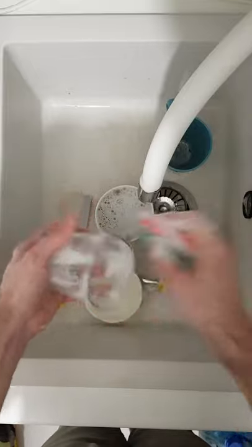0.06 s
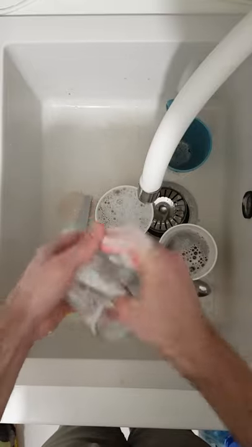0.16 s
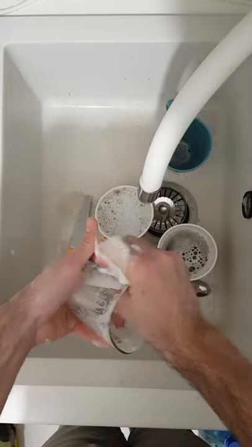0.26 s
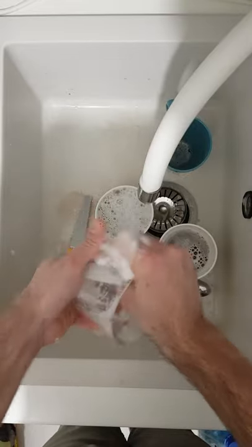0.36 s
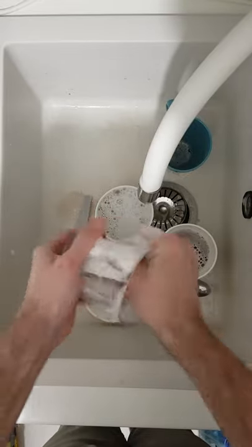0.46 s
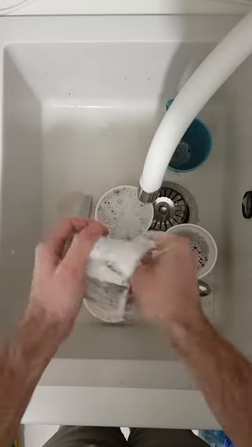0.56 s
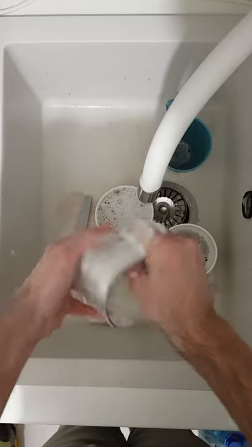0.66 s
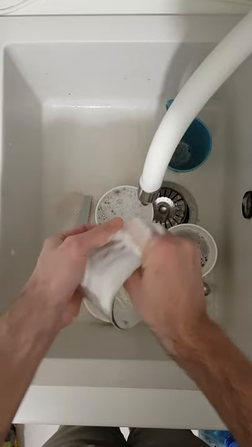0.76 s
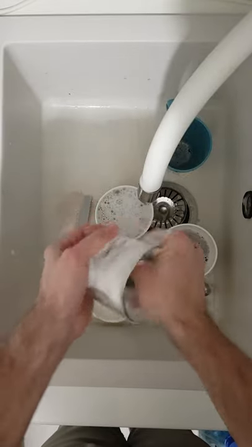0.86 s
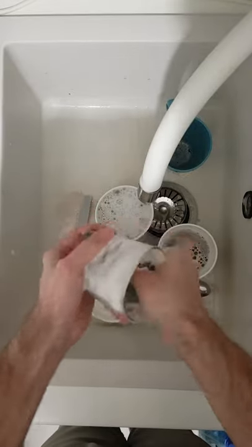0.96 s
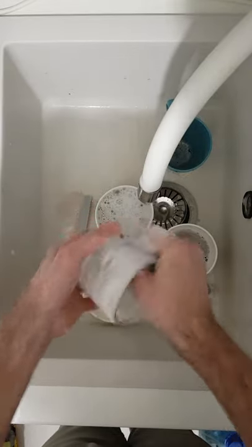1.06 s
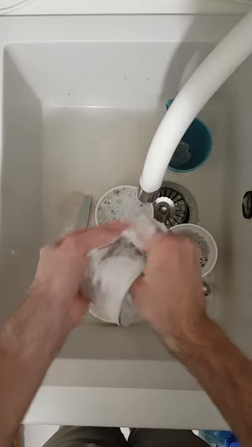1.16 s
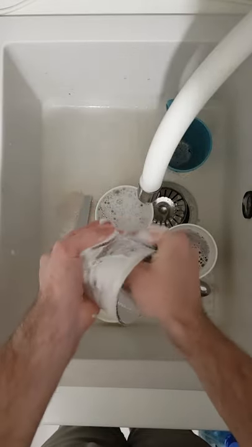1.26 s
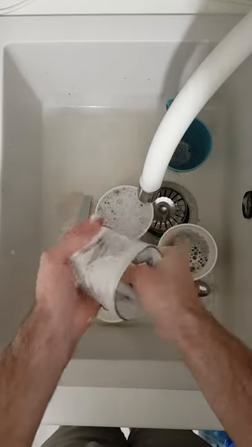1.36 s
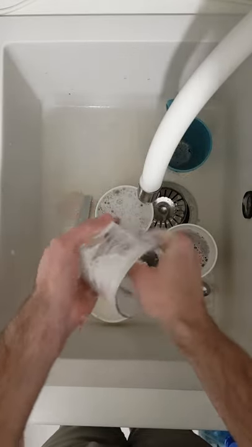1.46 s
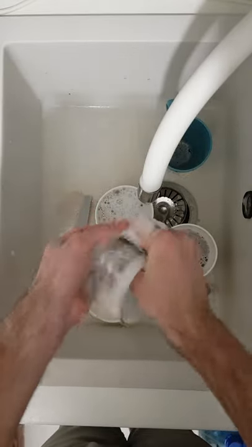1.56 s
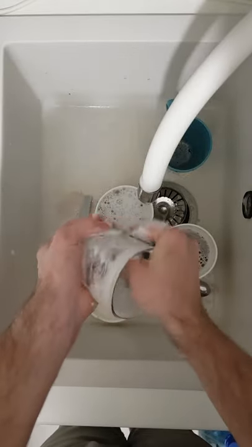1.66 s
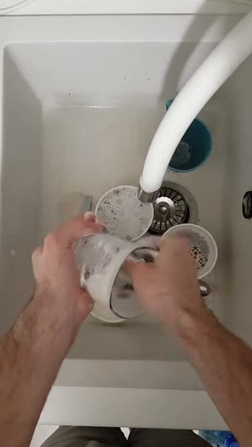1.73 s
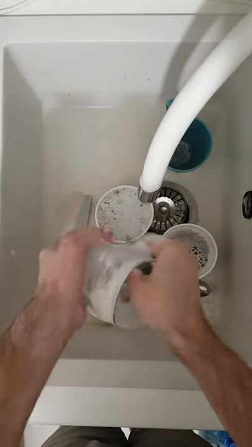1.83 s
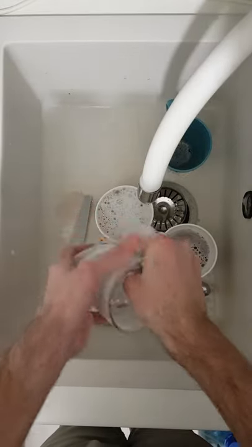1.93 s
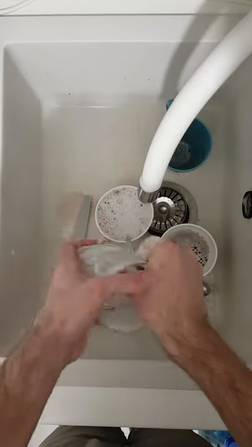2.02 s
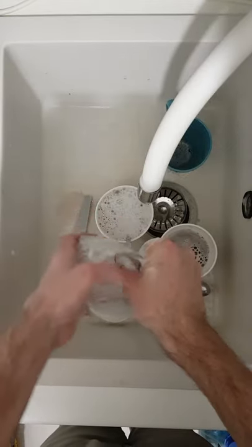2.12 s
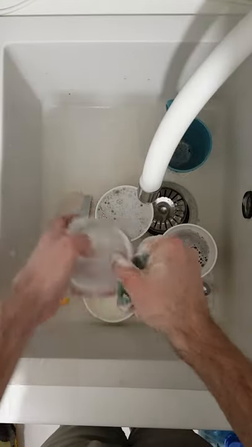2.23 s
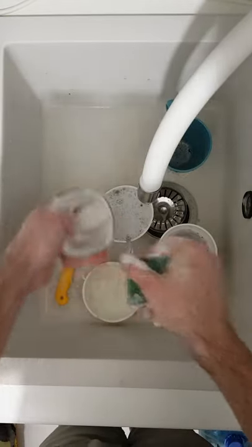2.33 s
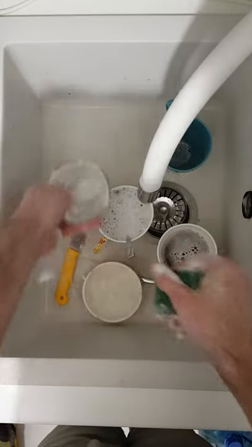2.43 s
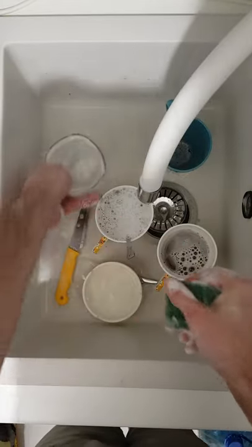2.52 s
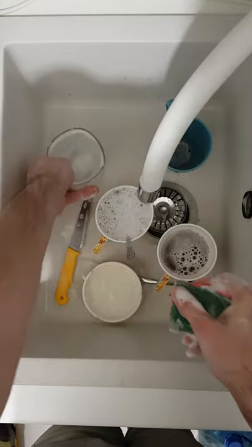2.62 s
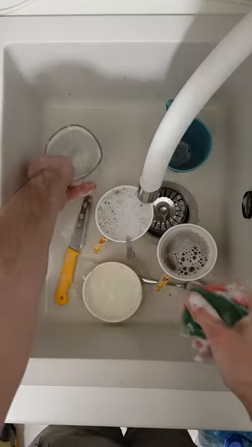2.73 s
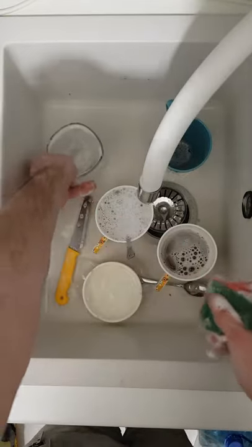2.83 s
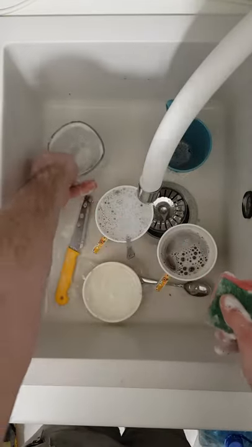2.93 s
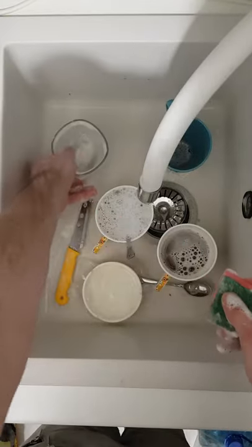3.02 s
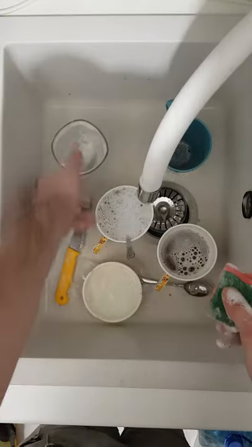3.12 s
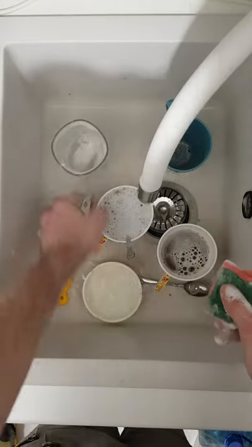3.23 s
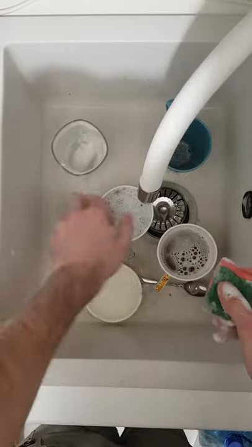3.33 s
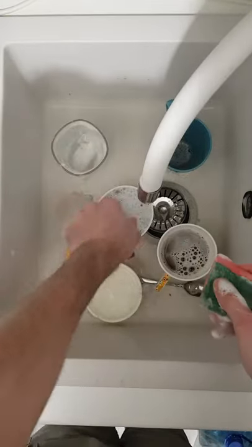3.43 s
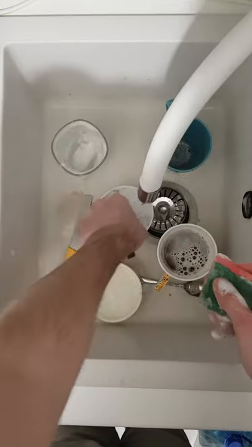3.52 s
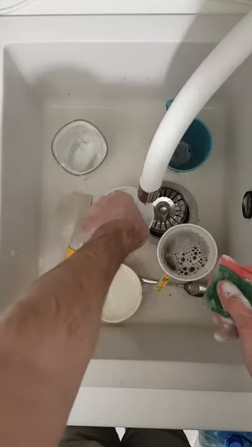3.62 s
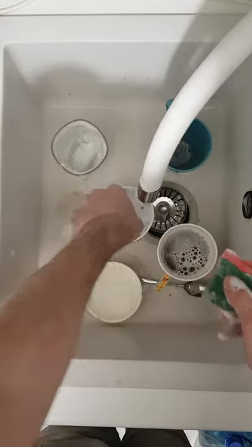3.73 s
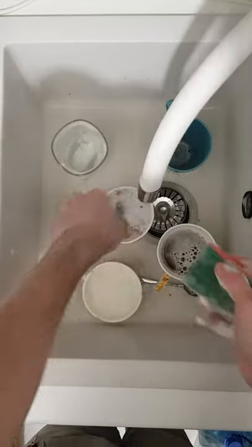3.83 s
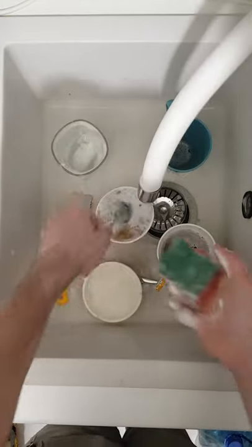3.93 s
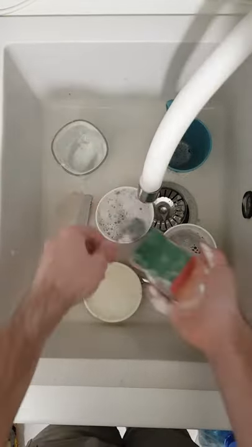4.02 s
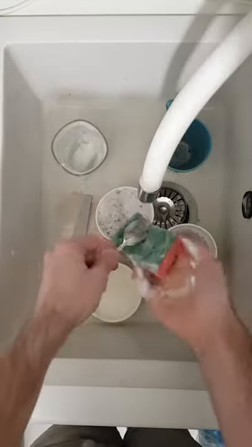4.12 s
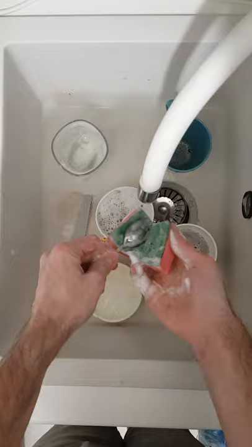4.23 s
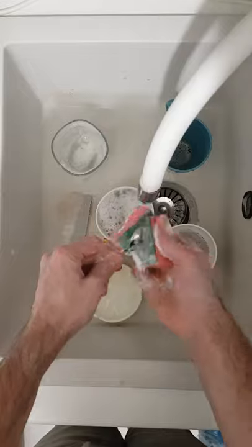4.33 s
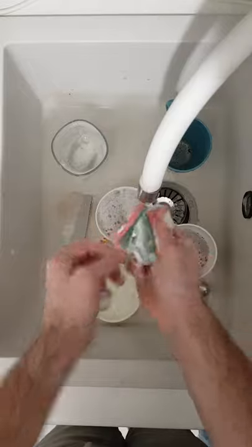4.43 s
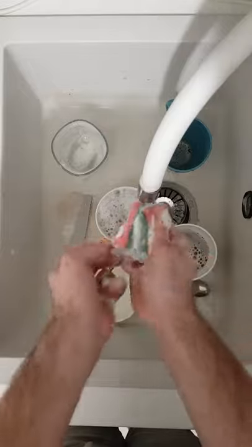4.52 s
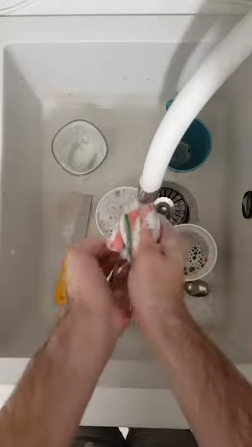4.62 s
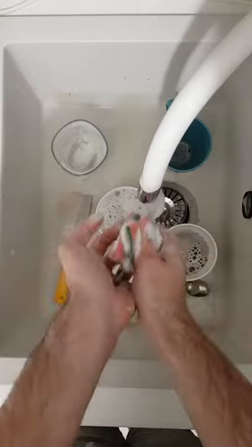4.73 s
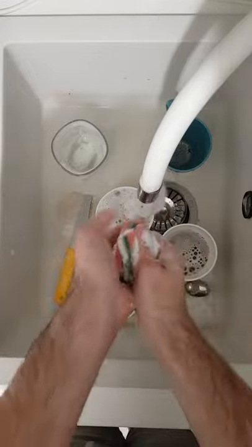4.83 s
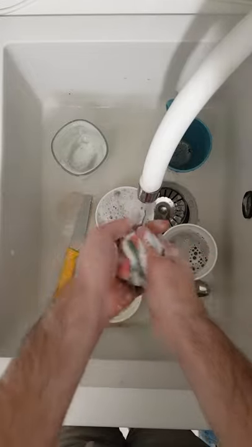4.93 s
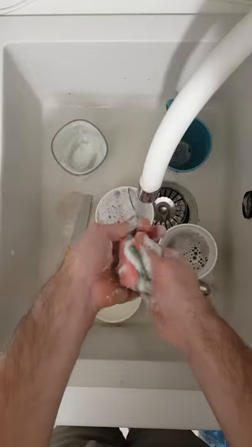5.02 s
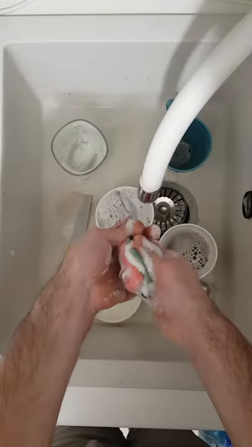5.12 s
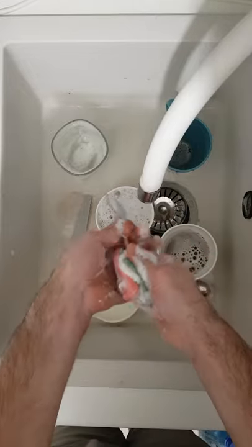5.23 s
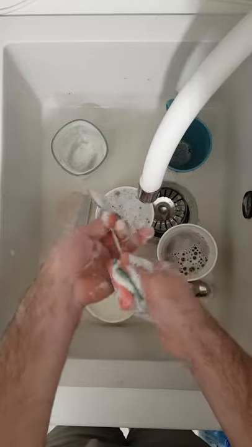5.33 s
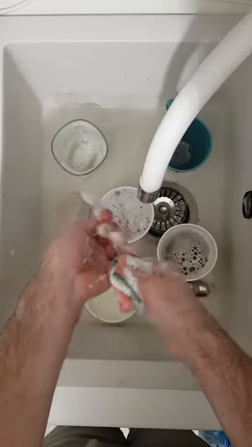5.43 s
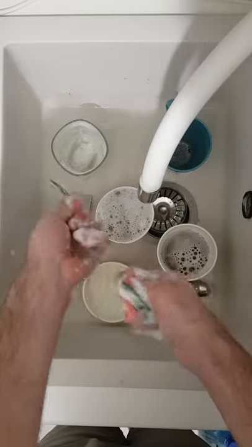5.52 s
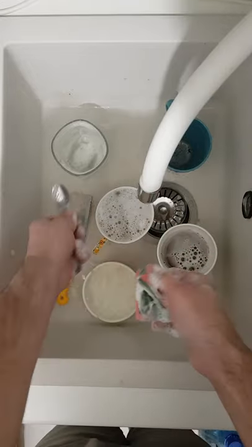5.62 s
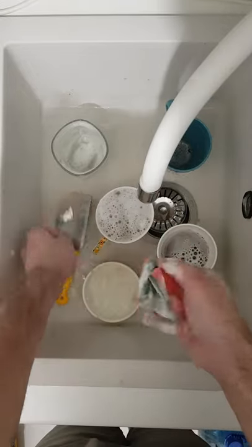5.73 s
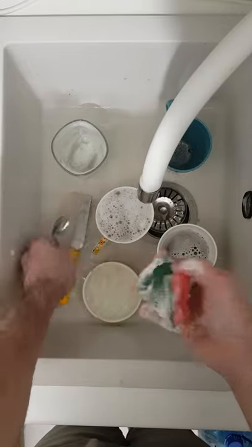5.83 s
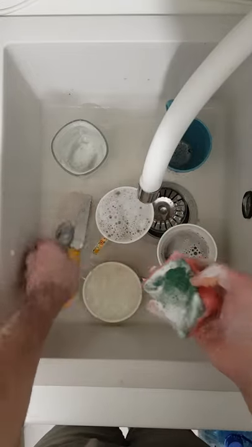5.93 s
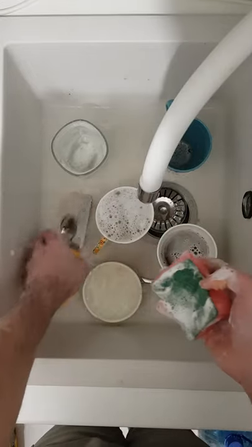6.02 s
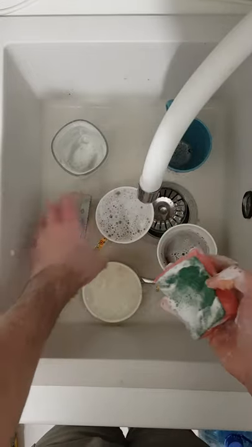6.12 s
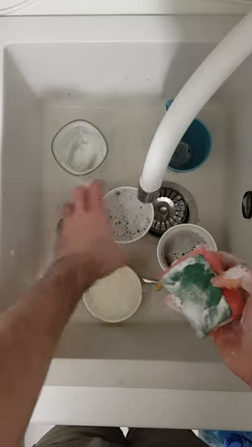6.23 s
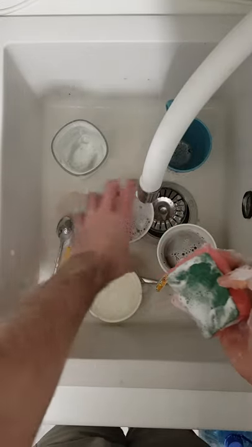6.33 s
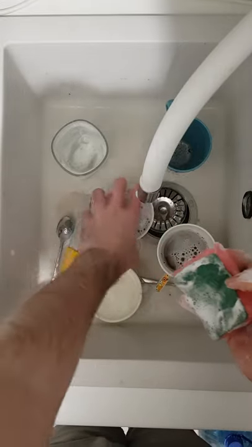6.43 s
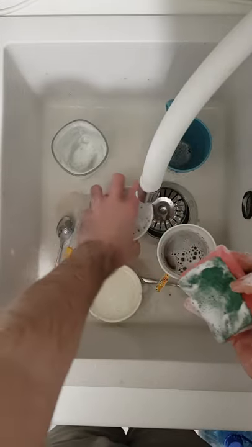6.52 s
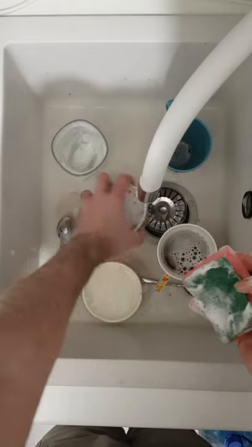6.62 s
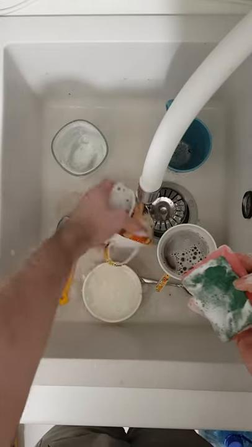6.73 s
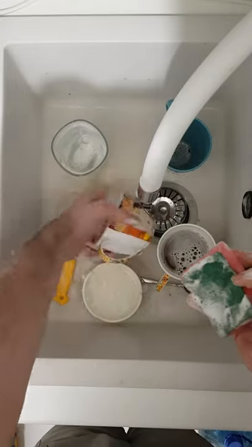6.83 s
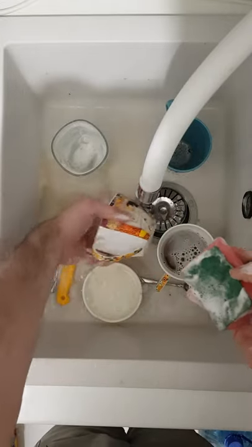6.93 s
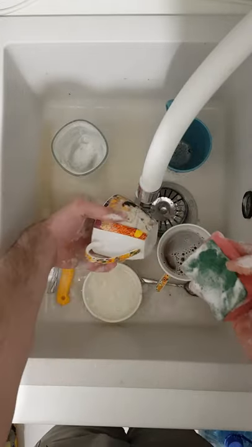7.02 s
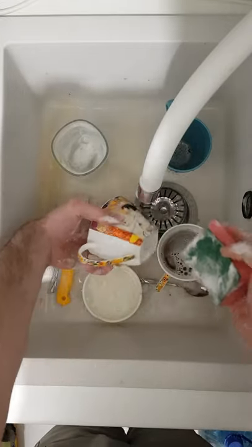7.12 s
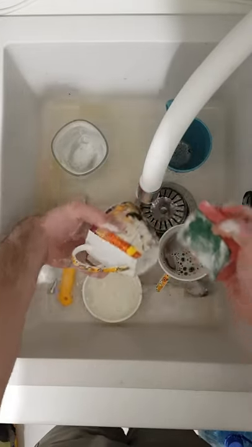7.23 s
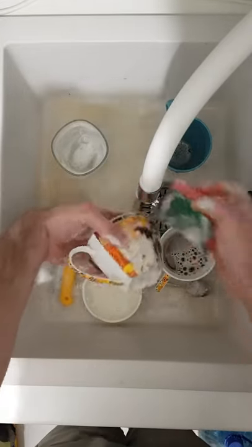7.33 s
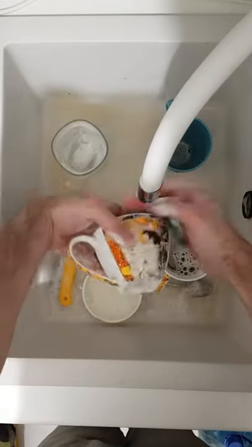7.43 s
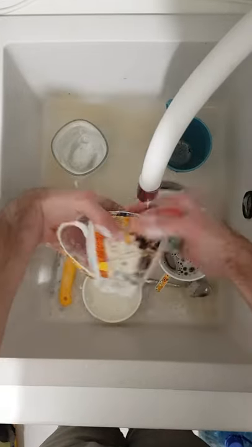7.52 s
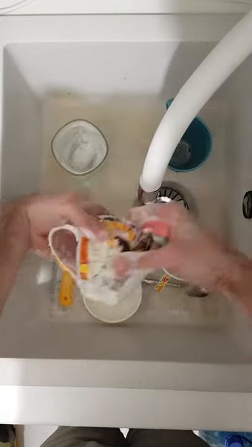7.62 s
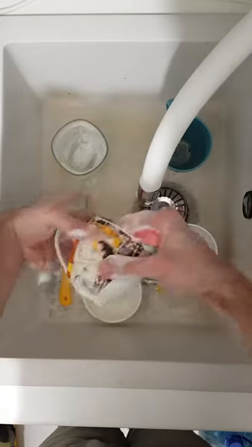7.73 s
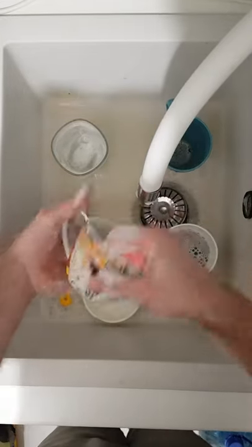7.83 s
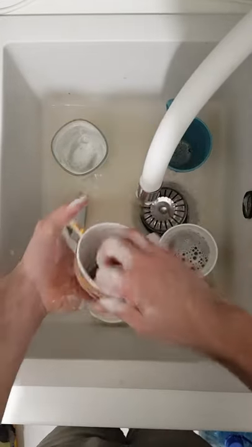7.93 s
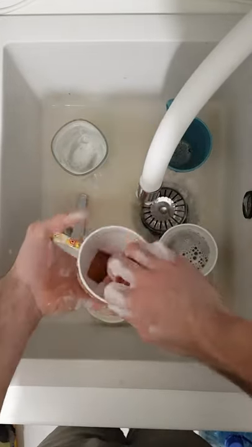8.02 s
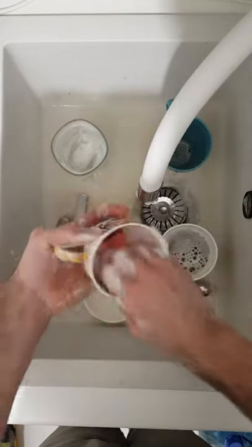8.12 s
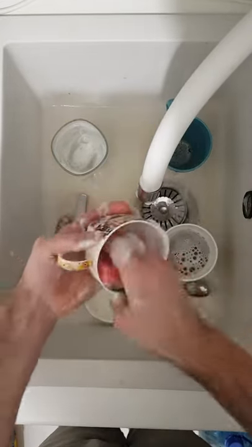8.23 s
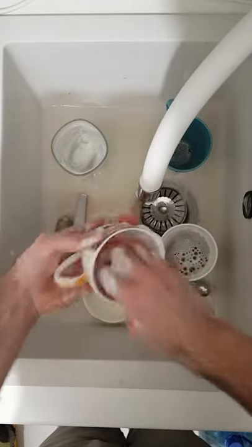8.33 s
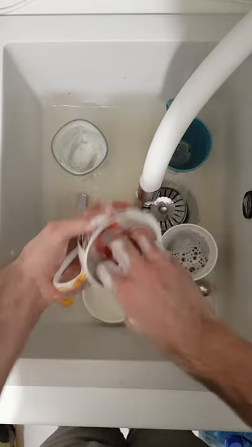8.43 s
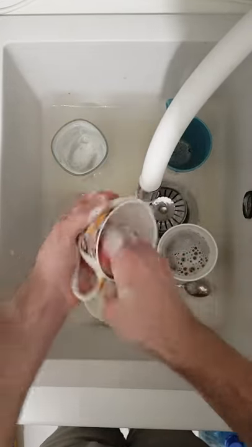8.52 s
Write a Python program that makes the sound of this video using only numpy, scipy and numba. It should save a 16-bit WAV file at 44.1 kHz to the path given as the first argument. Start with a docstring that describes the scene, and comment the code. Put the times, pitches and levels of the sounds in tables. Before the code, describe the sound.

A soapy sponge scrubs a glass in quick, soft strokes, squelching and fizzing, heard from just above a sink in a quiet kitchen. At about 2.9 and 3 seconds the glass is set down with two loud knocks that boom in the basin and leave it ringing briefly. A few soft bumps follow near 3.5 seconds. From about 4.2 to 6 seconds the sponge wipes a spoon with more wet squelches, and just after 6 seconds the spoon drops with a bright, bouncing clatter. A mug drags and rings lightly around 6.5 seconds, then water splashes out of it with bubbly plops from 6.8 to 7.4 seconds. Hollow, wet scrubbing inside the mug follows, with two light clacks near 8.2 seconds and a sharper one at 8.5. A faint low rumble from arms pushing against the sink runs underneath.

```python
"""A soapy sponge washing dishes in a deep composite sink, tap off; stereo microphone just above the basin.
Foam fizzes and water squelches as a glass is scrubbed; it is set down in two knocks that boom in the
basin and leave it ringing. A spoon is wiped and dropped with a clatter. A mug is tipped out, splashing
and trapping bubbles, then scrubbed inside. Underneath, the working arms rumble against the sink in a
quiet kitchen."""
import sys
import numpy as np
from scipy import signal
from scipy.fft import rfft, irfft, next_fast_len
from scipy.io import wavfile
from numba import njit

SR = 44100
rng = np.random.default_rng(int(sys.argv[2]) if len(sys.argv) > 2 else 0)


def persist_wave(psi):
    """Save psi, clipped to +-1, as 16-bit WAV."""
    counts = np.round(np.clip(psi, -1, 1) * 32767).astype(np.int16)
    wavfile.write(sys.argv[1], SR, np.atleast_2d(counts).T)


N = 377496

# sponge strokes on the glass (to 2.8 s), the spoon (to 6 s) and the mug: (time of hardest pressure [s],
# length [s], squelch [dB], foam re squelch [dB], hollow re squelch [dB], resonance of the hollow [Hz])
STROKES = [(0.02, 0.066, -75, 1, 4, 760), (0.168, 0.044, -55.5, 2.5, 2, 1252),
           (0.213, .06, -53, 0, -1.5, 1600), (0.304, 0.082, -52, 0, -4.5, 801),
           (0.388, 0.15, -57, -1.5, -3.5, 1400), (0.519, .075, -48.5, -3.5, 1.5, 796),
           (0.636, .06, -55, -5.5, -5, 1506), (0.849, .1, -54, -4.5, -15, 1500),
           (0.946, 0.067, -46.5, -7, -2.5, 1210), (1.058, 0.11, -64.5, -3, -4, 1700),
           (1.256, 0.15, -61, -0.5, -7, 1600), (1.348, 0.094, -50, -3.5, -5.5, 1350),
           (1.504, 0.048, -56, 0, -5, 1310), (1.624, 0.085, -63.5, 3.5, -17, 1800),
           (1.7, 0.075, -56, -3, -8, 1480), (1.789, 0.033, -62, -10, -3, 900),
           (1.855, 0.044, -66, 2, -3, 1700), (2.124, 0.17, -63, -7, -8, 1640),
           (2.266, .13, -63.5, 0, -8, 1856), (2.682, .22, -66, -2.5, 0, 1490),
           (4.21, 0.12, -68, 2, -20, 1801), (4.322, 0.12, -62, -0.5, -23, 1590),
           (4.417, 0.1, -43, -9, -4, 1343), (4.623, 0.11, -50, -15, -4.5, 1241),
           (4.754, 0.18, -50.5, -14, -5.5, 1370), (5.079, .12, -65, -16, -16, 1630),
           (5.328, .15, -50, -18.5, -12.5, 1606), (5.481, 0.063, -47.5, -9.5, -5, 1603),
           (5.676, 0.11, -58, -3, -9.5, 1800), (5.785, 0.057, -70, -4.5, -13.5, 1490),
           (5.921, 0.1, -68.5, 1.5, -17, 1580), (7.493, 0.069, -53, -4.5, -3.5, 1460),
           (7.598, 0.16, -61, -1, -7, 1453), (7.726, 0.064, -49.5, -8.5, 3.5, 900),
           (7.949, .08, -64.5, -5.5, -6.5, 1315), (8.09, 0.076, -53, -5.5, 7, 967),
           (8.14, 0.12, -50, -10.5, -5, 1260), (8.244, 0.1, -49.5, -15, 0.5, 1239),
           (8.326, 0.07, -55.5, -14, -2, 1130), (8.404, 0.053, -50, -12, 5.5, 1138),
           (8.485, 0.065, -53.5, -11, 0, 1210), (8.536, 0.056, -47, -16, 2.5, 1150)]
# dishes and hands meeting the basin: (time [s], level [dB], contact [ms], build-up [ms])
KNOCKS = [(0.525, -48.5, 10.6, 8), (0.573, -56, 3.8, 4.5), (1.151, -61, 13, 8.2),
          (2.867, -11.3, 0.61, 0.95), (3.014, -37, 2.1, 17), (3.042, -10.5, 0.65, 0.94),
          (3.508, -47.5, 9.6, 15), (3.559, -39, 2.05, 9.2), (3.594, -47.5, 0.43, 19),
          (3.63, -47.5, 1.55, 3.7), (3.735, -65, 0.54, 3), (3.891, -69, 3.2, 3.06), (4.233, -63.5, 11, 7),
          (5.83, -67, 5, 14), (5.976, -37.5, 1.15, 12), (6.075, -26.5, 0.94, 0.76),
          (6.518, -42.5, 0.58, 45), (6.565, -40.5, 1.5, 7), (7.524, -55, 8.3, 15), (8.39, -62.5, 5.3, 24),
          (8.532, -40, 0.71, 8.4)]
# spectrum of foam and spray: (frequency [Hz], level [dB])
FIZZ = [(1200, -19.5), (2500, -3.5), (3600, 0.5), (5000, -0.5), (7300, -3), (8800, -8), (12000, -3.5),
        (16000, -18)]
# how alike the microphone's two ports sound: (frequency [Hz], likeness [-1..1])
LIKENESS = [(60, 0.93), (250, 0.52), (600, 0.2), (1200, 0), (2400, -0.09), (6000, 0.05), (15000, 0.08)]


def from_db(db):
    """Decibels to gain."""
    return 10 ** (np.asarray(db) / 20)


def rms_one(x):
    """Scale to rms 1."""
    return x / np.sqrt(np.mean(x ** 2) + 1e-20)


def unit_attack(x):
    """Scale a blow so that its first 20 ms have rms 1."""
    return x / np.sqrt(np.mean(x[:, :SR // 50] ** 2) + 1e-20)


def at_hz(points, hz):
    """Read a table on a log-frequency axis."""
    f, value = np.transpose(points)
    return np.interp(np.log(np.maximum(hz, 1)), np.log(f), value)


def colour(x, spectrum):
    """Give a steady sound a spectrum, falling away beyond its ends."""
    hz = np.maximum(np.fft.rfftfreq(x.shape[-1], 1 / SR), 1)
    skirts = np.minimum(hz / spectrum[0][0], 1) ** 2 * np.minimum(spectrum[-1][0] / hz, 1) ** 2
    return irfft(rfft(x) * from_db(at_hz(spectrum, hz)) * skirts, x.shape[-1])


def ports(pair):
    """Two unrelated signals become left and right: alike in the bass, apart in the treble."""
    count = pair.shape[-1]
    alike = at_hz(LIKENESS, np.fft.rfftfreq(count, 1 / SR))
    mid, side = rfft(pair)
    return irfft(np.sqrt(1 + alike) * mid + np.sqrt(1 - alike) * side * [[1], [-1]], count)


def diffuse_noise(spectrum, count):
    """Coloured noise as the two ports pick it up."""
    return colour(ports(rng.standard_normal((2, count))), spectrum)


def pan(db):
    """Left and right gains for a level difference."""
    return from_db(np.array([[.5], [-.5]]) * db)


def add(out, s, sound):
    """Mix a sound in at its time."""
    start = int(s * SR)
    out[:, start:start + sound.shape[1]] += sound[:, :N - start]


def held(start, end, attack_s, release_s):
    """Attack, hold at 1, release."""
    t = np.arange(N) / SR
    onset = 1 - np.exp(-np.maximum(t - start, 0) / attack_s)
    return onset * np.exp(-np.minimum(np.maximum(t - end, 0) / release_s, 30))


def push(s, length, edge_db=6.5, rise_share=0.46, roundness=1.6):
    """Pressure swells to 1 and eases off again, edge_db down at both ends of its length."""
    t = np.arange(N) / SR - s
    away = np.maximum(-t / rise_share, t / (1 - rise_share)) / length
    return from_db(-np.minimum(edge_db * away ** roundness, 200))


def in_basin(x, echo_db, t60=0.12, size=2048, lag_samples=6):
    """Direct sound, later at the right port, then wall echoes that keep changing as the hands move."""
    count = len(x) // size + 1
    pieces = np.pad(x, (0, count * size - len(x))).reshape(count, size)
    decay = from_db(-60 * np.arange(3 * size) / (SR * t60))
    walls = rng.standard_normal((2, count, len(decay))) * decay / np.sqrt(np.sum(decay ** 2))
    echoes = signal.fftconvolve(pieces[None], walls, axes=2)
    out = np.zeros((2, next_fast_len((count + 4) * size)))
    for k in range(count):
        out[:, k * size:k * size + echoes.shape[2]] += echoes[:, k]
    direct = np.array([x, np.pad(x, (lag_samples, 0))[:len(x)]])
    return direct + from_db(echo_db) * ports(out)[:, :len(x)]


def bursts(per_s, spread_db):
    """Clicks at random moments, their sizes scattered by spread_db."""
    sizes = from_db(spread_db * np.minimum(rng.exponential(1, N), 4.5)) * rng.choice([-1, 1], N)
    return sizes * (rng.random(N) < per_s / SR)


def suds(spectrum, per_s, spread_db, echo_db):
    """Countless tiny films burst at random and echo in the basin; rms 1."""
    # where the hands sit in the stereo image: (frequency [Hz], left minus right [dB])
    hand_balance = [(100, 1), (700, 8.5), (1300, -5.5), (2400, -3.5), (4400, 4.5), (8000, 5.5),
                    (15000, 4.5)]
    balance = pan(at_hz(hand_balance, np.fft.rfftfreq(N, 1 / SR)))
    crackle = in_basin(bursts(per_s, spread_db), echo_db)
    return rms_one(colour(irfft(rfft(crackle) * balance, N), spectrum))


def bubbles(per_s, cycles, low_hz, high_hz, count=24):
    """Small air pockets, each ringing briefly at a pitch set by its size; rms 1."""
    births = bursts(per_s, spread_db=0)
    size_class = rng.integers(0, count, N)
    out = 0
    for k, hz in enumerate(np.geomspace(low_hz, high_hz, count)):
        r, w = from_db(-60 * hz / (cycles * SR)), 2 * np.pi * hz / SR
        kicks = births * (size_class == k) + 1e-18
        out = out + signal.lfilter([0, np.sin(w)], [1, -2 * r * np.cos(w), r * r], kicks)
    return rms_one(in_basin(out, echo_db=0.5))


@njit
def resonate(x, hz, width_hz):
    """A two-pole band-pass whose centre moves."""
    y, r = np.zeros_like(x), np.exp(-np.pi * width_hz / SR)
    for i in range(2, x.shape[1]):
        turn = 2 * r * np.cos(2 * np.pi * hz[i] / SR)
        for c in range(2):
            drive = (1 - r * r) / 2 * (x[c, i] - x[c, i - 2])
            y[c, i] = drive + turn * y[c, i - 1] - r * r * y[c, i - 2]
    return y


def scrubbing(grip_s=0.022, held_squelch_db=-2):
    """Strength of fizz, squelch and hollow: each stroke adds its power to that of the held sponge."""
    # the sponge keeps fizzing while held to a dish: (start [s], end [s], foam level [dB])
    holds = [(0.0, 1.92, -69), (1.97, 3.26, -76.5), (3.7, 4.15, -79), (4.15, 4.95, -72.5),
             (4.95, 5.45, -82.5), (5.5, 6.02, -72.5), (7.4, 8.15, -67)]
    fizz = sum(from_db(db) * held(start, end, grip_s, grip_s) for start, end, db in holds) ** 2
    squelch, hollow = fizz * from_db(held_squelch_db) ** 2, 0
    for s, length, db, foam_db, hollow_db, _ in STROKES:
        pressure = push(s, length)
        fizz = fizz + (from_db(db + foam_db) * pressure ** 0.99) ** 2
        squelch = squelch + (from_db(db) * pressure) ** 2
        hollow = hollow + (from_db(db + hollow_db) * pressure ** 1.4) ** 2   # needs firm pressure
    return np.sqrt([fizz, squelch, hollow])


def sponge():
    """Foam fizzes on top, water squelches in the pores, and the hollow of hand and dish resounds."""
    # spectra of the wet pores, the hollow and the gush through it: (frequency [Hz], level [dB])
    pore_spectrum = [(600, -32.5), (1050, -8), (1380, -1.5), (1700, 0), (2200, -1.5), (3000, -8.5),
                     (5000, -20)]
    hollow_spectrum = [(130, -24.5), (210, -23.5), (262, -4.5), (305, -22), (420, -7.5), (530, -4),
                       (680, -7), (790, 5), (950, -5), (1150, -8.5), (1600, -25)]
    gush_spectrum = [(400, -12.5), (700, -2.5), (2400, -2), (4000, -9.5)]
    fizz, squelch, hollow = scrubbing()
    foam = from_db(4.5) * fizz * suds(FIZZ, per_s=3000, spread_db=4.5, echo_db=4.5)
    pores = from_db(0.5) * suds(pore_spectrum, per_s=650, spread_db=1, echo_db=4)
    pores += from_db(-8) * bubbles(per_s=200, cycles=12, low_hz=1150, high_hz=3600)
    body = from_db(-1) * hollow * suds(hollow_spectrum, per_s=900, spread_db=2, echo_db=0.5)
    # the gap between hand and dish opens and closes with each stroke, moving its resonance
    times, *_, hollow_hz = np.transpose(STROKES)
    gap_hz = np.interp(np.arange(N) / SR, times, hollow_hz)
    gush = suds(gush_spectrum, per_s=700, spread_db=3, echo_db=0.5)
    cavity = rms_one(resonate(gush, gap_hz, width_hz=280.0))
    return foam + squelch * pores + body + from_db(-3) * np.hypot(squelch, hollow) * cavity


def room_tone():
    """The steady quiet of the kitchen."""
    # spectrum of the room: (frequency [Hz], level [dB])
    room_spectrum = [(18, -32), (30, -19), (93, -6), (134, -14.5), (161, -25.5), (280, -20), (461, -15),
                     (913, -35), (1590, -30.5), (3580, -38.5), (4420, -25), (6050, -33.5), (16000, -20)]
    return from_db(-72) * rms_one(diffuse_noise(room_spectrum, N))


def sink_rumble(arms_db=-73.5, shudder_db=-24.5, attack_s=0.006, shudder_t60_s=0.83):
    """Working arms push the sink, and knocks shake it by their force times their contact time."""
    # arms pushing against the sink: (time [s], length [s], level [dB])
    arm_pushes = [(0.22, 0.23, -66), (0.55, 0.062, -52), (0.66, 0.12, -53.5), (0.97, 0.086, -56),
                  (1.17, 0.078, -63), (2.6, 0.084, -52.5), (3.607, 0.14, -49.5), (4.25, 0.052, -53.5),
                  (4.57, .05, -63.5), (5.01, 0.056, -61), (5.57, 0.075, -48.5), (5.8, .2, -64.5),
                  (6.0, .06, -46.5), (6.93, .08, -59), (7.6, 0.23, -49), (8.43, 0.064, -60)]
    # spectrum of the whole sink shaking: (frequency [Hz], level [dB])
    sink_spectrum = [(22, -23.5), (42, -7.5), (60, 2.5), (82, -10.5), (105, -4), (150, -21), (300, -26),
                     (600, -48.5)]
    shoves = [from_db(db) * push(s, length) for s, length, db in arm_pushes]
    shudders = [from_db(db + shudder_db) * contact_ms * held(s, s, attack_s, shudder_t60_s / np.log(1000))
                for s, db, contact_ms, _ in KNOCKS]
    strength = np.sqrt(from_db(arms_db) ** 2 + sum(gain ** 2 for gain in shoves + shudders))
    return from_db(-3.5) * strength * rms_one(diffuse_noise(sink_spectrum, N)) * pan(2.4)


def reflections(spectrum, t60_scale, crack_db, kitchen_db, hold_s):
    """A first crack, echoes that circle the basin briefly and die by band, and a faint kitchen tail."""
    # ring time of the basin, before t60_scale: (frequency [Hz], t60 [s])
    basin_t60 = [(60, 0.17), (250, 0.34), (1000, 0.24), (3000, 0.15), (8000, 0.27), (15000, 0.24)]
    t = np.arange(SR) / SR
    noise = rfft(diffuse_noise(spectrum, SR))
    octave = np.log2(np.clip(np.fft.rfftfreq(SR, 1 / SR), 62.5, 16000) / 62.5)
    crack = from_db(crack_db) * np.exp(-t / 0.0023)
    kitchen = from_db(kitchen_db - 60 * t / .5)
    out = 0
    for k in range(9):
        band = irfft(noise * np.maximum(1 - abs(octave - k), 0), SR)
        t60 = t60_scale * at_hz(basin_t60, 62.5 * 2 ** k)
        echoes = from_db(-60 * np.maximum(t - hold_s, 0) / t60)
        out = out + band * (crack + echoes + kitchen)
    return out


def ringing(modes):
    """Decaying sines; the higher ones reach the two ports out of step."""
    t, out = np.arange(SR) / SR, 0
    for hz, db, t60 in modes:
        apart = np.arccos(at_hz(LIKENESS, hz)) * rng.choice([-.5, .5])
        phase = rng.uniform(0, 2 * np.pi) + np.array([[apart], [-apart]])
        out = out + from_db(db - 60 * t / t60) * np.sin(2 * np.pi * hz * t + phase)
    return out


def swell(ms):
    """A dragged contact builds up gradually."""
    return 1 - np.exp(-1000 * np.arange(SR) / SR / ms)


def soften(x, contact_ms):
    """A soft, long contact cannot excite the high frequencies."""
    lowpass = signal.butter(2, 1000 / contact_ms, fs=SR, output="sos")
    return unit_attack(signal.sosfilt(lowpass, x))


def knocks(in_step_hz=600):
    """Each blow sets the basin booming; a short contact is bright, a dragged one swells up."""
    # resonances of the basin: (frequency [Hz], level [dB], t60 [s])
    basin_modes = [(108, -26, 0.28), (262.5, -10, .23), (338, -13, 0.22), (505, -14.5, 0.24),
                   (564, -16, .15), (791, -10, .17), (897.7, 2.5, .15), (1020, -15.5, 0.09),
                   (1260, -1, 0.12), (1520, -7.5, 0.1), (1600, -1.5, .11), (1748, -3.5, .14),
                   (2121, -2, 0.098), (2560, -0.5, .11)]
    # spectrum of a blow on the basin: (frequency [Hz], level [dB])
    thud_spectrum = [(40, -16), (100, -13), (170, -15), (300, -5.5), (600, -7.5), (1000, -2), (1600, 2),
                     (2600, -1.5), (3800, -5), (6000, -11.5), (10000, -8), (15000, -13.5)]
    out = np.zeros((2, N))
    for s, db, contact_ms, build_up_ms in KNOCKS:
        thud = reflections(thud_spectrum, t60_scale=0.7, crack_db=-13.5, kitchen_db=-22, hold_s=0.012)
        boom = ringing(basin_modes)
        blow = (unit_attack(thud) + unit_attack(boom)) * swell(build_up_ms)
        add(out, s, from_db(db) * soften(blow, contact_ms))
    # the long waves of the whole basin reach both ports in step
    highpass = signal.butter(1, in_step_hz, "high", fs=SR, output="sos")
    side = signal.sosfilt(highpass, (out[0] - out[1]) / 2)
    return (out.mean(axis=0) + side * [[1], [-1]]) * pan(1)


def plops(cycles=40, rise=0.06, gain_db=-11):
    """A trapped bubble swells over one cycle, rings with rising pitch and echoes off the walls."""
    # single air pockets popping in water and suds: (time [s], level [dB], starting pitch [Hz])
    air_pockets = [(0.634, -43.5, 1400), (0.964, -36, 594), (4.242, -45, 1940), (6.847, -38.5, 3690),
                   (6.894, -27.5, 1140), (6.911, -34, 550), (6.932, -33.5, 4100), (7.003, -41.5, 1260),
                   (7.025, -37, 1750), (7.085, -29.5, 3530), (7.101, -22.5, 2260), (7.119, -27.5, 2370),
                   (7.159, -33, 518), (7.181, -35, 564), (7.222, -27.5, 1690), (7.274, -37, 1630),
                   (7.319, -43, 1660), (8.022, -45, 2250)]
    out, t = np.zeros((2, N)), np.arange(SR // 5) / SR
    for s, db, hz in air_pockets:
        age = t * hz / cycles
        pitch = hz * (1 + rise * np.minimum(age, 1))
        envelope = np.minimum(t * hz, 1) * from_db(-60 * age)
        bubble = envelope * np.sin(2 * np.pi * np.cumsum(pitch) / SR)
        add(out, s, from_db(db + gain_db) * unit_attack(in_basin(bubble, echo_db=-1)))
    return out


def ticks():
    """Bright ticks of drops and rims, and the snap of the glass landing."""
    # ticks and snaps: (time [s], level [dB])
    tick_events = [(1.631, -55.5), (2.868, -51), (3.043, -46.5), (3.566, -58.5), (4.908, -61),
                   (6.8486, -46), (7.3699, -47.5), (7.9287, -57)]
    # spectrum of a tick: (frequency [Hz], level [dB])
    tick_spectrum = [(800, -36), (2500, -9), (4000, -2), (7500, -7.5), (15000, -9)]
    out = np.zeros((2, N))
    for s, db in tick_events:
        tick = reflections(tick_spectrum, t60_scale=0.68, crack_db=3, kitchen_db=-28, hold_s=0.001)
        add(out, s, from_db(db) * unit_attack(tick))
    return out


def dish_rings():
    """The glass rings on after landing; the mug starts singing as its foot drags."""
    # the glass landing, the mug dragged and lifted: (time [s], level [dB])
    glass_taps = [(2.868, -35), (3.043, -32)]
    mug_taps = [(6.524, -31.5), (6.568, -25.5)]
    # resonances of glass and mug: (frequency [Hz], level [dB], t60 [s])
    glass_modes = [(1816, 0, .66), (1920, 0, 0.53), (2150, -6, 0.33)]
    mug_modes = [(1480, 2, 0.12), (1870, -17, 0.089)]
    glass = ringing(glass_modes) * swell(ms=0.97)
    mug = ringing(mug_modes) * swell(ms=12)
    out = np.zeros((2, N))
    for taps, ring in ((glass_taps, glass), (mug_taps, mug)):
        for s, db in taps:
            add(out, s, from_db(db) * ring)
    return out


def spoon(longest_t60_s=0.25):
    """Steel clatters on the basin floor; each landing excites the resonances differently."""
    # the spoon lands and bounces: (time [s], level [dB], contact [ms])
    landings = [(6.021, -38, 0.088), (6.075, -15.5, 0.081), (6.154, -28, 0.11)]
    # ringing of the steel spoon, with one basin resonance near 2.6 kHz:
    # (frequency [Hz], level [dB], t60 before the cap [s])
    ring_modes = [(2645, -8.5, 0.27), (2930, -15, .14), (3580, -11, .18), (4290, -8.5, 0.15),
                  (4530, -4, 0.2), (5450, -9, .12), (5940, -2, 0.13), (6260, -9, .14), (6760, -7.5, .11),
                  (6944, -2.5, 0.1), (7430, -3.5, .13), (7840, -6.5, 0.099), (8500, -9.5, 0.094),
                  (9020, -10, 0.19), (9700, -9, 0.11), (10580, -5.5, 0.23), (10720, -8, .15),
                  (12270, -2.5, .16), (12280, -10, 0.15), (14045, 4, .11), (14500, -6.5, .11),
                  (15080, -5, .11), (15600, -9.5, .11)]
    # spectrum of the clatter: (frequency [Hz], level [dB])
    spectrum = [(60, 8.5), (300, -7), (700, -3.5), (1250, 11.5), (1800, 6), (2600, 0), (5000, -1.5),
                (7000, -7), (9000, -13.5), (15000, -6.5)]
    out = np.zeros((2, N))
    for s, db, contact_ms in landings:
        clatter = reflections(spectrum, t60_scale=1, crack_db=-19.5, kitchen_db=-24.5, hold_s=0.0025)
        modes = [(hz, level + rng.normal(0, 2), min(t60, longest_t60_s))
                 for hz, level, t60 in ring_modes]
        ring = from_db(1) * unit_attack(ringing(modes)) * pan(6)
        add(out, s, from_db(db) * soften(unit_attack(clatter) + ring, contact_ms))
    return out


def flow(start_s=6.807, end_s=7.385, spray_db_per_s=-3.5, splash_db_per_s=-12.5):
    """Strength of spray and splash: a stream that thins as the mug empties, with a few slops on top."""
    # water leaving the mug all at once: (time [s], length [s], splash level [dB])
    surges = [(6.907, .04, -39), (7.132, 0.085, -36.5), (7.233, 0.044, -41.5)]
    stream = held(start_s, end_s, attack_s=0.012, release_s=0.022)
    age = np.maximum(np.arange(N) / SR - start_s, 0)
    slops = sum(from_db(db) * push(s, length) for s, length, db in surges)
    spray = np.hypot(stream * from_db(-48 + spray_db_per_s * age), from_db(-4) * slops)
    splash = np.hypot(stream * from_db(-46 + splash_db_per_s * age), slops)
    return spray, splash


def pouring():
    """Water from the mug slaps on the basin floor in coarse drops, traps air and throws up spray."""
    # spectrum of the coarse drops: (frequency [Hz], level [dB])
    splash_spectrum = [(200, -34), (500, -2), (900, -13.5), (1300, 5), (2300, 5), (3500, 3.5),
                       (6000, -12.5)]
    spray, splash = flow()
    fine_drops = from_db(-1.5) * suds(FIZZ, per_s=900, spread_db=4.5, echo_db=2)
    pings = from_db(-6) * bubbles(per_s=110, cycles=50, low_hz=1197, high_hz=3440)
    coarse_drops = from_db(-4.5) * suds(splash_spectrum, per_s=570, spread_db=1, echo_db=2)
    return spray * fine_drops + splash * (coarse_drops + pings)


def mug_clacks():
    """The hand damps the mug, so its clacks are short."""
    # sharp blows on the held mug: (time [s], level [dB], contact [ms])
    blows = [(8.184, -34.5, 0.26), (8.2115, -33.5, 0.51), (8.549, -19, 0.23)]
    # spectrum of a clack: (frequency [Hz], level [dB])
    clack_spectrum = [(100, -40), (400, -17), (800, -2), (1400, 2.5), (2200, -14), (2800, -5.5),
                      (5000, -8.5), (9000, -15), (15000, 2)]
    out = np.zeros((2, N))
    for s, db, contact_ms in blows:
        clack = reflections(clack_spectrum, t60_scale=0.38, crack_db=-22, kitchen_db=-35, hold_s=0.0083)
        add(out, s, from_db(db) * soften(clack, contact_ms))
    return out


def scene():
    """Everything that reaches the microphone above the sink."""
    water = sponge() + pouring() + plops()
    impacts = knocks() + dish_rings() + spoon() + mug_clacks() + ticks()
    return water + impacts + sink_rumble() + room_tone()


def record(dry):
    """The microphone drops the deepest bass, the highest peaks are rounded and the top is cut."""
    low_cut = signal.butter(4, 34, "high", fs=SR, output="sos")
    high_cut = signal.ellip(10, .3, 80, 16000, fs=SR, output="sos")
    rounded = np.tanh(signal.sosfilt(low_cut, dry))
    return signal.sosfilt(high_cut, rounded)


dry = scene()
out = record(dry)
persist_wave(out)
```